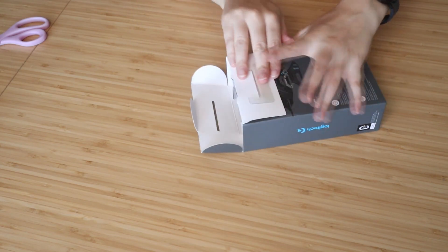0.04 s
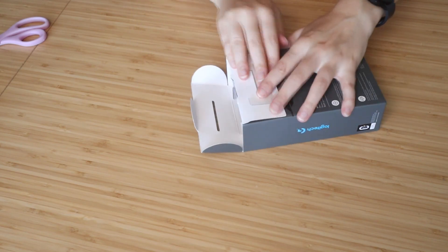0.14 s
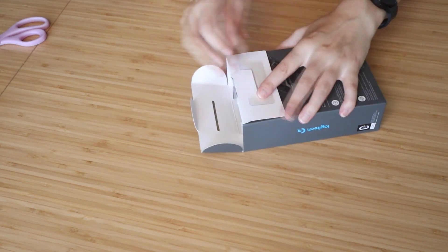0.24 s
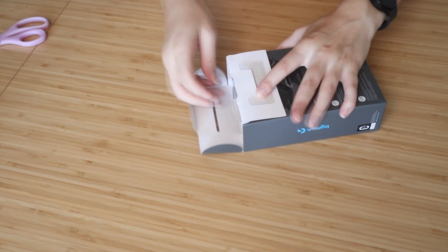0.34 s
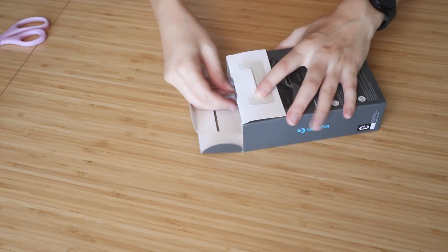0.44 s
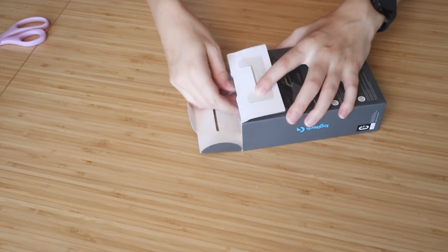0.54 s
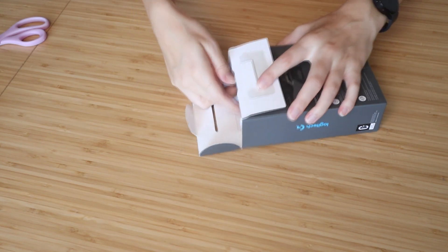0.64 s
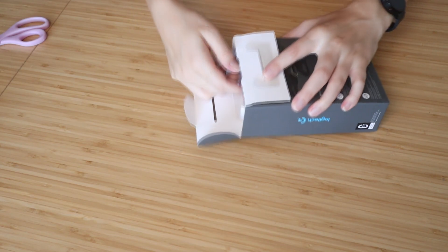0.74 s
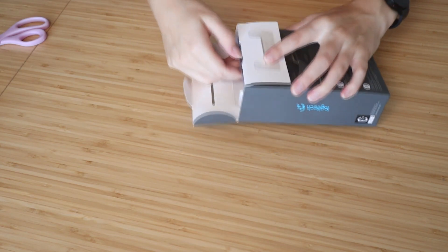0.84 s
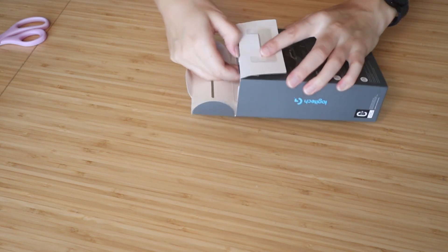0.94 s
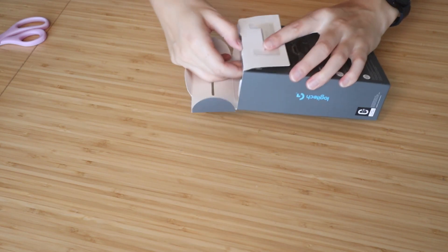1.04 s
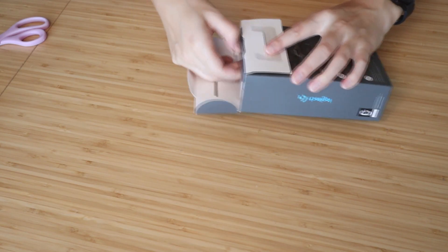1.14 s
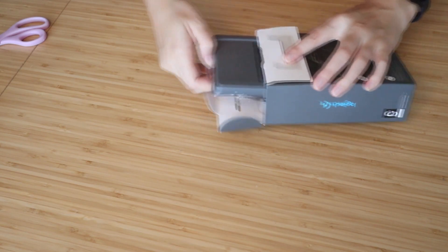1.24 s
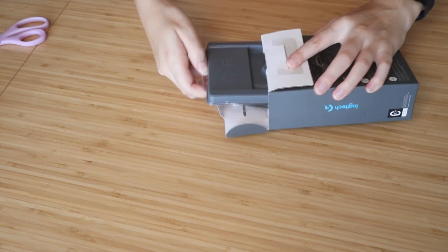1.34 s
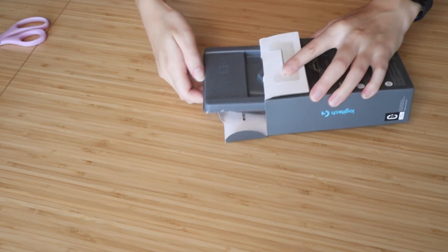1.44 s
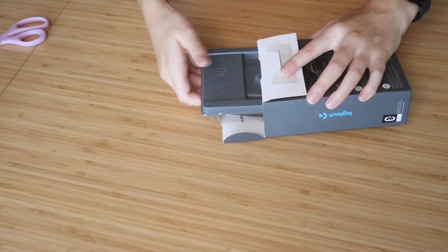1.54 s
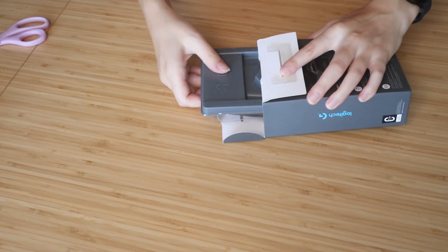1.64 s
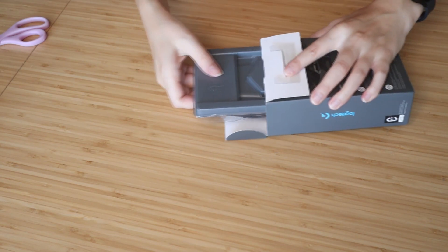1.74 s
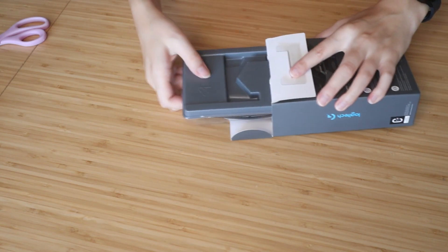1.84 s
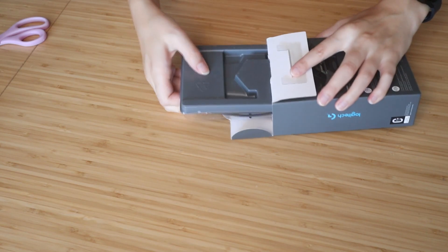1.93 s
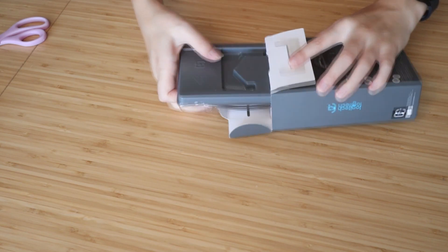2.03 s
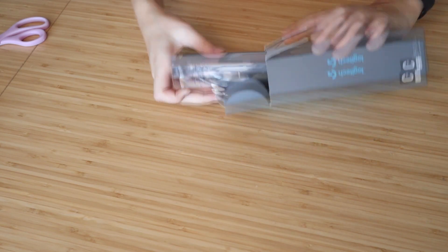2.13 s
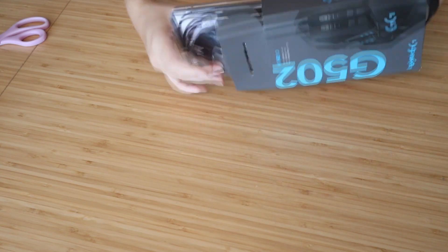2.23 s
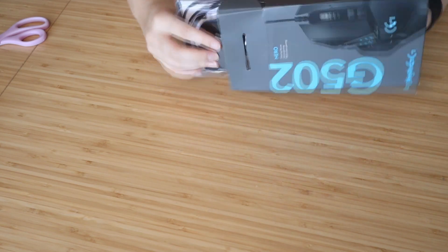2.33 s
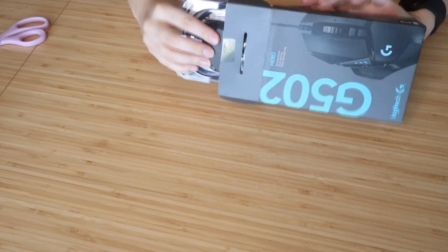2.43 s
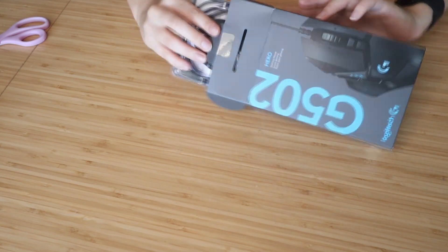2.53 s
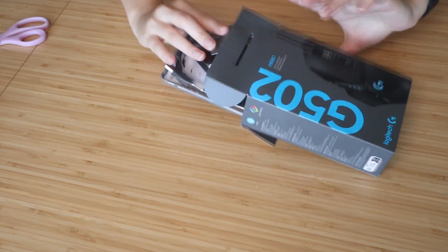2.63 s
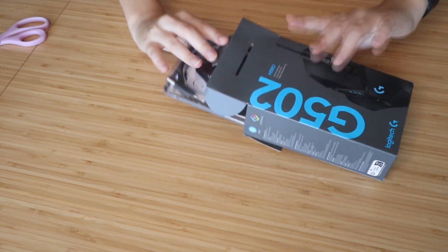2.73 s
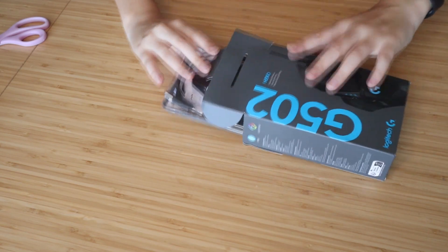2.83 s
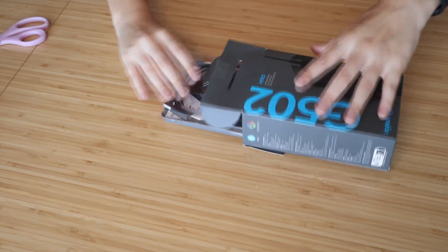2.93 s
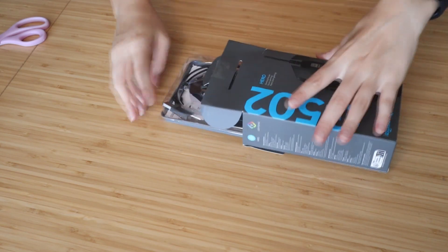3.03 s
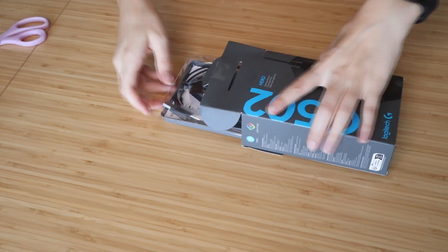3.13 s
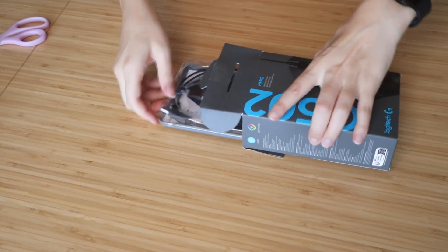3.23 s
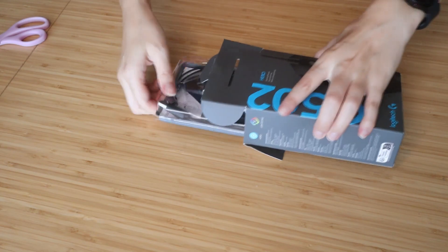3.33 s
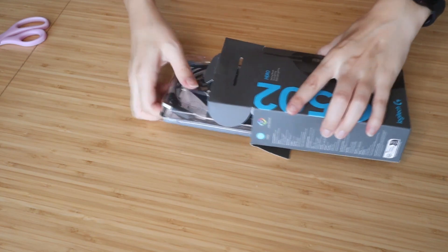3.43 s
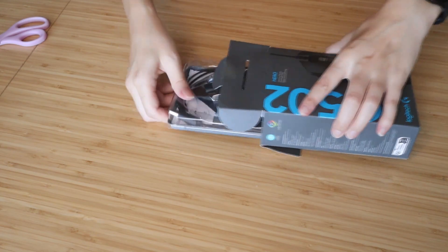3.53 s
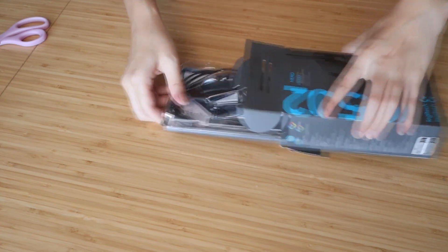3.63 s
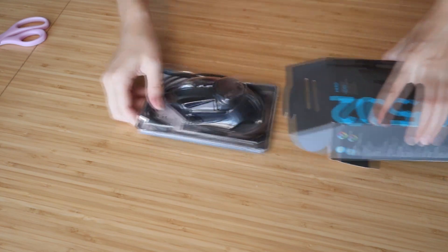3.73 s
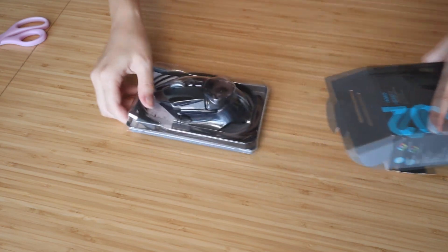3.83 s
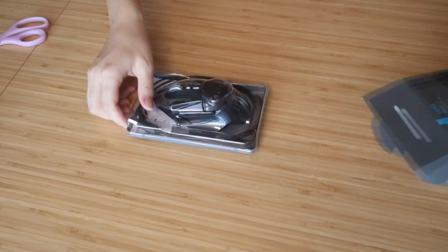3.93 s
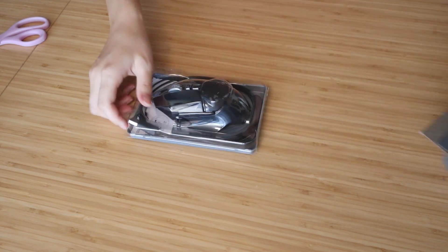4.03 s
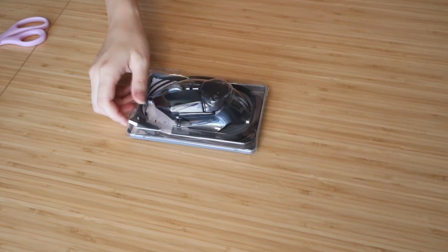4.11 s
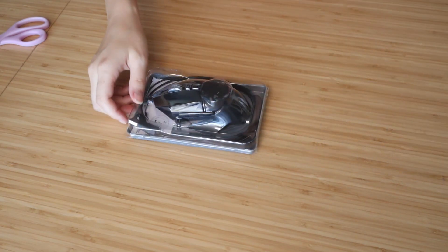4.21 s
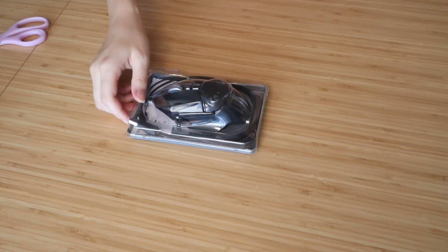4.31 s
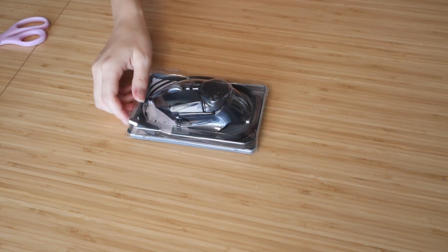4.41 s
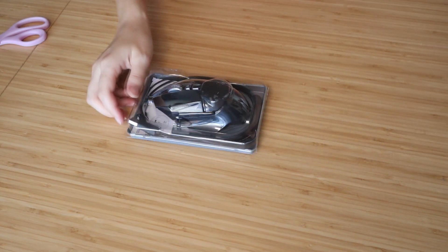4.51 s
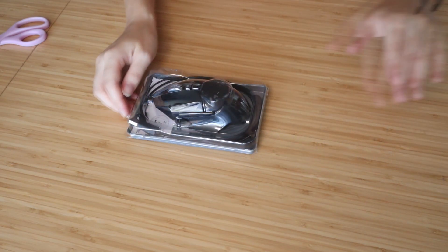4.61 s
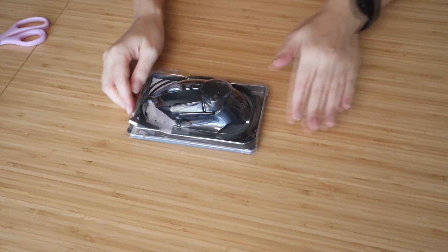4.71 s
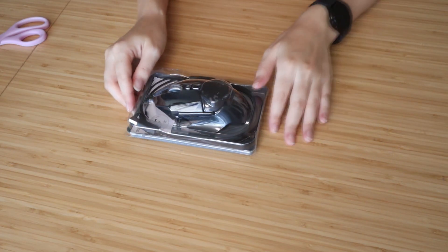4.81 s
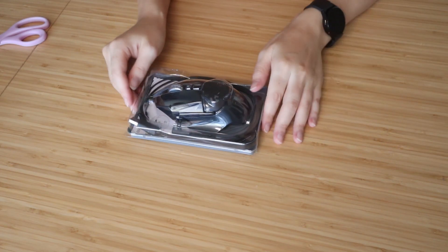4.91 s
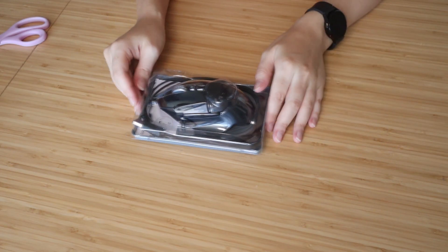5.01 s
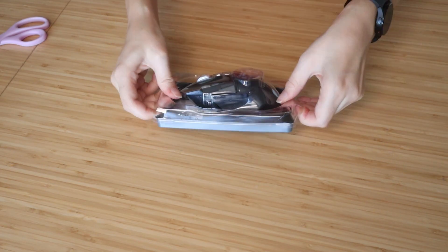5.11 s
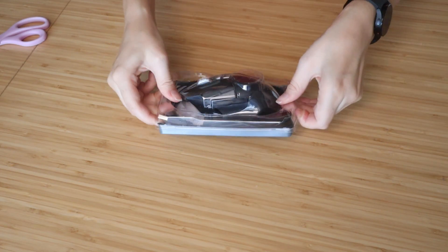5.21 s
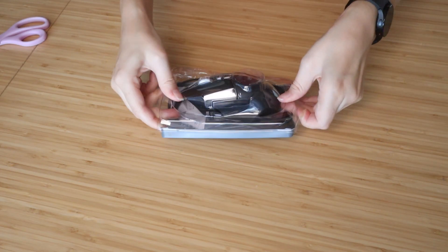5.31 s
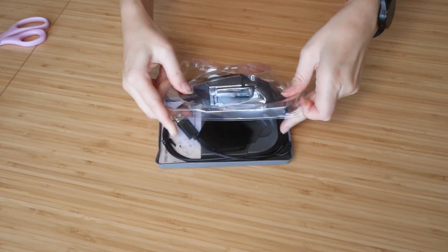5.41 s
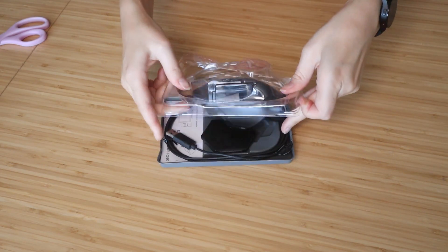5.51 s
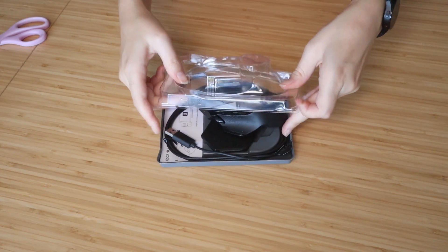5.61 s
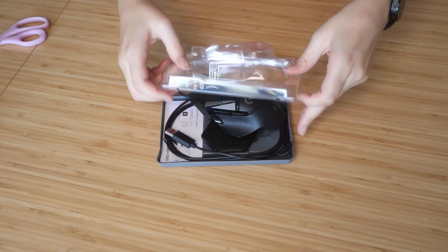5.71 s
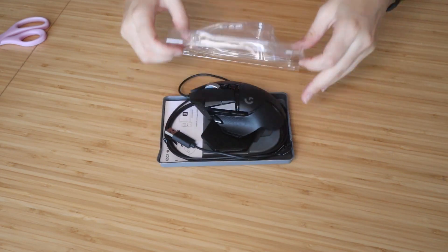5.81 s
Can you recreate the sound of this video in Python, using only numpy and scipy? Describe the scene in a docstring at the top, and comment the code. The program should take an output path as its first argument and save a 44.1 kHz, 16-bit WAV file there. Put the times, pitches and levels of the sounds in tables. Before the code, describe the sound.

Unboxing sounds captured fairly close, with short lively reflections from a bare room: quiet cardboard flicks and dry hand rubs, scattered dull knocks, a quick tray scrape, a boomy drop of the box onto the desk, more knocks, and a half-second scrape as the empty box is pushed off. Finally, bright, dense plastic snaps and a small crinkle with low bumps, ending in light taps.

```python
"""Flaps flick and hands rub as a cardboard box is opened on a wooden desk in a bare, slightly ringing room.
The inner tray rubs and groans out of its sleeve; the box is turned over, dropped and slid away.
Then the clear plastic lid of the tray creaks, snaps free and crinkles as it is lifted.
Blows are decaying modes and noise bursts; friction is random catches over hiss, coloured by the panels.
The room adds a noise echo with its own decay in each band, and faint air."""
import sys
import numpy as np
from scipy import signal
from scipy.fft import rfft, irfft, next_fast_len
from scipy.io import wavfile

SR = 44100
rng = np.random.default_rng(int(sys.argv[2]) if len(sys.argv) > 2 else 0)


def generate_wav(sig):
    """Save sig (samples, or channels by samples) to the path in sys.argv[1] as 16-bit PCM at SR."""
    pcm = np.round(np.clip(np.atleast_2d(sig).T, -1, 1) * 32767).astype(np.int16)
    wavfile.write(sys.argv[1], SR, pcm)


N = 258161
CUTOFF_HZ = 16000


def from_db(db):
    """Decibels to gain."""
    return 10 ** (np.asarray(db) / 20)


def rms_one(x):
    """Scale to rms 1."""
    return x / np.sqrt(np.mean(x ** 2) + 1e-20)


def unit_blow(x):
    """Scale a short sound to the energy of 10 ms at rms 1."""
    return x / np.sqrt(np.sum(x ** 2) / (SR / 100) + 1e-20)


def at_hz(points, hz, axis=1):
    """Read one column of a table on a log-frequency axis."""
    points = np.array(points)
    return np.interp(np.log(hz + 1e-3), np.log(points[:, 0]), points[:, axis])


def band(x, low_hz, high_hz, order=2):
    """Causal band-pass."""
    sos = signal.butter(order, [low_hz, min(high_hz, SR / 2 - 1)], "band", fs=SR, output="sos")
    return signal.sosfilt(sos, x)


def coloured(x, spectrum):
    """Give a signal the colour of a spectrum."""
    size = next_fast_len(N)
    hz = np.arange(size // 2 + 1) * SR / size
    return irfft(rfft(x, size) * from_db(at_hz(spectrum, hz)), size)[:N]


def mode(t, hz, t60_s):
    """A struck resonance: sine with exponential decay."""
    return np.sin(2 * np.pi * hz * t) * from_db(-60 * t / t60_s)


def burst(t, low_hz, high_hz, t60_s):
    """Many overlapping resonances that die together: decaying band noise."""
    decaying = rng.standard_normal(len(t)) * from_db(-60 * t / t60_s)
    return unit_blow(band(decaying, low_hz, high_hz))


# still room, relative spectrum: [f/Hz, density/dB per Hz]
AIR_COLOUR = [(25, -22), (40, -7), (58, 7.5), (85, -15), (120, 3), (170, -6), (600, -13.5), (2800, -27),
              (4200, -28), (6000, -35), (16000, -42)]
AIR_DB = -65.5


def room_air():
    """Faint steady noise of the still room."""
    return from_db(AIR_DB) * rms_one(coloured(rng.standard_normal(N), AIR_COLOUR))


ATTACK_S, RELEASE_DB_PER_S = 0.0044, 239


def strokes(table, attack_s=ATTACK_S, release_db_per_s=RELEASE_DB_PER_S):
    """Body and hiss gains of strokes: quick attack, level hold, release; overlaps add in power."""
    t = np.arange(N) / SR
    power = np.zeros((2, N))
    for start_s, length_s, body_db, hiss_db in table:
        age = np.maximum(t - start_s, 0)
        fall_db = np.minimum(release_db_per_s * np.maximum(age - length_s, 0), 200)
        envelope = np.minimum(age / attack_s, 1) * from_db(-fall_db)
        power += (from_db([[body_db], [hiss_db]]) * envelope) ** 2
    return np.sqrt(power)


# hiss above SHEEN_HZ grows faster with stroke speed: slow is dull, fast is bright
SHEEN_HZ, SHEEN_GROWTH = 5800, 0.41


def friction(gains, colour, catches_per_s, spread_db, smooth_db, body_trim_db, hiss_trim_db, sheen_db):
    """Fibres catch and let go at random over a smooth hiss; the panels give them their colour."""
    body_gain, speed = gains
    sizes = from_db(spread_db * np.minimum(rng.exponential(1, N), 4)) * rng.choice([-1, 1], N)
    impulses = sizes * (rng.random(N) < catches_per_s / SR)
    catches = coloured(rms_one(impulses), colour)
    gliding = from_db(smooth_db) * coloured(rng.standard_normal(N), colour)

    # uneven hand pressure clumps the catches
    pressure_db = 2.8 * rms_one(band(rng.standard_normal(N), 14, 70)) - 1
    body = rms_one(band(catches + gliding, 35, 2410, order=3))
    body *= body_gain * from_db(body_trim_db + pressure_db)

    # soft catches reach the treble less
    fine = rms_one(band(from_db(-5) * catches + gliding, 2200, 17000, order=3))
    brightness = from_db(sheen_db) * (speed / speed.max()) ** SHEEN_GROWTH
    sheen = band(fine, SHEEN_HZ, 20000, order=3) * brightness
    hiss = band(fine, 130, SHEEN_HZ, order=3) + sheen
    return body + hiss * speed * from_db(hiss_trim_db + .5 * pressure_db)


# hands and inner tray along the cardboard, before trims: [start t/s, length/s, body level/dB, hiss level/dB]
RUB_STROKES = [(0.0, 0.11, -53.5, -56), (0.15, 0.18, -66, -67.5), (0.455, 0.22, -59.5, -64),
               (0.665, 0.12, -61, -58), (0.8, 0.26, -63, -66), (1.03, 0.33, -57.5, -64),
               (1.26, 0.077, -42, -46.5), (1.335, 0.057, -44.5, -54.5), (1.44, .14, -56, -63.5),
               (1.785, 0.18, -56, -55.5), (2.04, 0.2, -68, -74), (2.15, 0.31, -59, -64.5),
               (2.55, 0.22, -57.5, -52.5), (2.8, 0.22, -61, -65), (2.985, 0.13, -51.5, -64.5),
               (3.18, 0.13, -57.5, -62), (3.325, .04, -54, -61.5), (3.42, 0.2, -60.5, -65),
               (3.585, 0.051, -54, -56.5), (3.655, 0.13, -51, -53), (3.73, 0.13, -51, -49)]
# rubbed cardboard, relative spectrum: [f/Hz, density/dB per Hz]
RUB_COLOUR = [(60, 2.5), (130, -20), (300, -4.5), (590, 2), (900, -3), (1450, -3.5), (2800, -8.5),
              (3900, -8), (5200, -20), (9000, -26.5), (16000, -41.5)]
# skid after each knock, before trims: levels against the knock
SKID_BODY_DB, SKID_HISS_DB, SKID_FADE_DB_PER_S = -19.5, -28.5, 142.5


def rub():
    """Hands and tray rub the cardboard, which also skids on after each knock."""
    skid_table = [(s, 0, knock_db + SKID_BODY_DB, knock_db + SKID_HISS_DB)
                  for s, _, _, knock_db, _ in BOX_KNOCKS]
    skids = strokes(skid_table, release_db_per_s=SKID_FADE_DB_PER_S)
    return friction(np.hypot(strokes(RUB_STROKES), skids), RUB_COLOUR, catches_per_s=450, spread_db=-0.5,
                    smooth_db=-4, body_trim_db=-1.5, hiss_trim_db=0.5, sheen_db=6)


CREASES_PER_S, CREASE_DB, CREASE_SPREAD_DB = 26, -3, 12.5


def creases(t60_s):
    """Small creases give way: random ticks scaled by the hiss gain of the rubbing strokes."""
    hiss_gain = strokes(RUB_STROKES)[1]
    sizes = from_db(CREASE_DB + CREASE_SPREAD_DB * rng.uniform(-2, 1, N))
    ticks = sizes * (rng.random(N) < CREASES_PER_S / SR) * hiss_gain
    return signal.fftconvolve(ticks, burst(np.arange(SR // 20) / SR, 700, 4800, t60_s))[:N]


# room echo: [f/Hz, t60/s, echo level against direct/dB]
ROOM_BANDS = [(117.8, 0.56, -5), (190, 1, -2.5), (306.7, 0.69, -2.5), (640, 0.29, -7.5), (1240, 0.36, -3.5),
              (2690, 0.48, -5), (4240, 0.45, -5), (6300, 0.38, -12.5), (16000, 1, -11.5)]


def room(x, build_s):
    """Echoes thicken within milliseconds and die away at a rate of their own in each band."""
    t = np.arange(SR) / SR
    white = rng.standard_normal((2, SR))
    build = 1 - np.exp(-(t / build_s) ** 2)
    edges = np.geomspace(45, 18000, 18)
    response = np.zeros(SR)
    for k, (low, high) in enumerate(zip(edges, edges[1:])):
        hz = np.sqrt(low * high)
        decay = from_db(-60 * t / at_hz(ROOM_BANDS, hz))
        tail = band(white[k % 2], low, high) * decay * build
        # energy in proportion to bandwidth
        share = np.sqrt(2 * (high - low) / SR / np.sum(tail ** 2))
        response += tail * share * from_db(at_hz(ROOM_BANDS, hz, axis=2))
    return signal.fftconvolve(x, response)[:N]


def knock_hush(level_db, side_s):
    """Soft noise around each knock: it swells just before and fades just after."""
    t = np.arange(N) / SR
    swell = sum(from_db(knock_db - 9 * np.abs(t - s) / side_s) for s, _, _, knock_db, _ in BOX_KNOCKS)
    return from_db(level_db) * swell * rms_one(coloured(rng.standard_normal(N), RUB_COLOUR))


def blows(table, modes, modes_db, grain_db, ring_cycles, contact_s, thump_t60_s,
          crack_hz, crack_t60_s, crack_ring_db, tick_db, lowest_hz):
    """Each blow bends one panel, rings the whole shell, thumps the air inside and cracks at the edge."""
    t = np.arange(SR // 8) / SR
    out = np.zeros(N + len(t))
    for s, panel_hz, thump_db, knock_db, crack_db in table:
        # the place of contact decides how strongly each mode answers
        shell = sum(mode(t, hz, t60_s) * from_db(db + rng.normal(0, 3)) * rng.choice([-1, 1])
                    for hz, db, t60_s in modes)
        grain = from_db(grain_db) * burst(t, 430, 2250, crack_t60_s)
        panel = unit_blow(mode(t, panel_hz, ring_cycles / panel_hz))
        struck = panel + from_db(modes_db) * unit_blow(shell) + grain
        knock = unit_blow(band(struck, lowest_hz, CUTOFF_HZ))
        thump = burst(t, 210, 430, thump_t60_s)

        edge = from_db(crack_ring_db) * unit_blow(mode(t, crack_hz, crack_t60_s))
        crack = unit_blow(edge + burst(t, .83 * crack_hz, 1.076 * crack_hz, crack_t60_s))
        top = from_db(-18) * burst(t, 9000, 15700, crack_t60_s)
        tick = unit_blow(burst(t, 4900, 9770, crack_t60_s) + top)

        gains = from_db([thump_db, knock_db, crack_db, crack_db + tick_db])
        blow = gains @ np.array([thump, knock, crack, tick])
        start = int(s * SR)
        # a soft material yields for a moment before the full force arrives
        out[start:start + len(t)] += blow * (1 - np.exp(-t / contact_s))
    return out[:N]


# box knocks, levels over 10 ms before the soft onset:
# [t/s, panel f/Hz, thump level/dB, knock level/dB, crack level/dB]
BOX_KNOCKS = [(0.013, 304, -49, -69, -90), (0.0495, 1140, -61, -52, -51.5), (0.0999, 460, -54, -50, -49.5),
              (0.2442, 590, -54, -60, -56.5), (0.3911, 1560, -96, -57.5, -61), (0.492, 437, -57, -41, -53),
              (0.5601, 450, -73, -49, -60), (0.599, 604, -65, -47, -87), (0.6568, 1200, -51, -25.5, -40),
              (0.8064, 1360, -84, -49, -49), (0.8638, 1330, -72, -50.5, -49.5),
              (1.016, 556, -80, -44.5, -67), (1.1285, 570, -55, -42.5, -54.5),
              (1.1634, 915, -48, -41.5, -57), (1.2616, 497, -51, -34.5, -48.5),
              (1.3590, 605, -51, -31, -59), (1.3858, 680, -73, -36.5, -53), (1.453, 580, -71, -43.5, -55),
              (1.5332, 570, -77, -60, -54.5), (1.7408, 630, -61, -52.5, -65),
              (1.9613, 900, -47, -42.5, -58), (2.211, 920, -49.5, -35, -50),
              (2.3889, 660, -54.5, -52, -59.5), (2.5028, 643, -31.5, -17, -53),
              (2.5072, 674, -28, -25.5, -55), (2.7501, 469, -37, -32, -61),
              (2.9729, 484, -45.5, -45.5, -77), (3.0478, 1320, -37, -35, -56.5),
              (3.2485, 580, -48.5, -53.5, -59), (3.6052, 538, -55, -45.5, -79),
              (3.7415, 620, -44.5, -36, -45), (3.7545, 654, -63, -32, -62), (3.7795, 1210, -50, -29, -46.5),
              (4.105, 490, -45, -46.5, -53), (4.5019, 634, -47.5, -47, -73)]
# cardboard shell resonances: [f/Hz, relative level/dB, t60/s]
BOX_MODES = [(412.6, -3.5, 0.031), (554.4, -15.5, 0.22), (650, 6, 0.036), (870, -8, 0.016),
             (1075, -7, 0.042), (1493, -1.5, 0.02), (1748, -9, 0.025), (2032, 3.5, 0.012)]


def box_knocks():
    """Dull blows on damped cardboard panels."""
    return blows(BOX_KNOCKS, BOX_MODES, modes_db=-3, grain_db=-7.5, ring_cycles=11, contact_s=0.00033,
                 thump_t60_s=0.049, crack_hz=3844, crack_t60_s=0.019, crack_ring_db=-9,
                 tick_db=-6.0, lowest_hz=190)


# low booms, level over 10 ms: [t/s, f/Hz, level/dB]
LOW_BOOMS = [(1.163, 122, -69), (2.503, 100.3, -32.5), (2.751, 109, -48), (3.782, 86, -51),
             (4.508, 171, -47.5), (5.455, 95, -39), (5.653, 138, -34.5)]
BOOM_T60_S = 0.093


def low_booms():
    """Soft, low booms under some of the knocks and the lid's release: decaying sines."""
    t = np.arange(N) / SR
    return sum(from_db(db) * unit_blow(mode(np.clip(t - s, 0, 1), hz, BOOM_T60_S))
               for s, hz, db in LOW_BOOMS)


GROAN_S, GROAN_LENGTH_S, GROAN_FROM_HZ, GROAN_TO_HZ, GROAN_DB = 1.28, .12, 205, 115, -47


def groan(waver):
    """Stick and slip as the tray slows in its sleeve: a low, unsteady, falling tone."""
    progress = np.clip((np.arange(N) / SR - GROAN_S) / GROAN_LENGTH_S, 0, 1)
    unsteady = 1 + waver * rms_one(band(rng.standard_normal(N), 12, 70))
    hz = GROAN_FROM_HZ * (GROAN_TO_HZ / GROAN_FROM_HZ) ** progress * unsteady
    swell = np.sqrt(4 * progress * (1 - progress))
    return from_db(GROAN_DB) * swell * np.sin(2 * np.pi * np.cumsum(hz) / SR)


def sliding(curve):
    """Body and hiss gains of one long push, fading away at both ends."""
    s, body_db, hiss_db = np.transpose(curve)
    t = np.arange(N) / SR
    fade_db = RELEASE_DB_PER_S * np.abs(t - np.clip(t, s[0], s[-1]))
    return from_db([np.interp(t, s, body_db) - fade_db, np.interp(t, s, hiss_db) - fade_db])


# empty box pushed over the desk, before trims: [t/s, body level/dB, hiss level/dB]
SLIDE_CURVE = [(3.93, -60, -62), (4.028, -49, -50), (4.118, -53, -48.5), (4.144, -55.5, -48.5),
               (4.356, -54.5, -54), (4.456, -61.5, -65.5), (4.48, -75, -68.5)]
# fingers let go of the tray and feel for the lid, before trims:
# [start t/s, length/s, body level/dB, hiss level/dB]
TOUCHES = [(4.51, 0.053, -63.5, -73.5), (4.76, .025, -72.5, -76.5), (4.9, .1, -76, -73.5),
           (5.055, 0.096, -65, -69.5), (5.16, 0.046, -51, -66)]
# sliding friction, relative spectrum: [f/Hz, density/dB per Hz]
SLIDE_COLOUR = [(60, -5), (150, -5.5), (350, -4.5), (620, 0.5), (900, -3), (1500, -1.5), (2500, -1),
                (3700, 0), (5500, -10), (8500, -19.5), (16000, -41)]


def slide_and_touches():
    """Dense catches as the empty box scrapes over the desk, then fingers touch tray and lid."""
    gains = np.hypot(sliding(SLIDE_CURVE), strokes(TOUCHES))
    return friction(gains, SLIDE_COLOUR, catches_per_s=3300, spread_db=8, smooth_db=1,
                    body_trim_db=-1.0, hiss_trim_db=2.5, sheen_db=7.0)


# HOLLOW_DB is against the slide's body gain
HOLLOW_HZ, HOLLOW_WIDTH_HZ, HOLLOW_DB = 623, 100, -8


def hollow():
    """Air in the empty box hums as it slides: narrow-band noise at the cavity pitch."""
    half_hz = HOLLOW_WIDTH_HZ / 2
    stirred = band(rng.standard_normal(N), HOLLOW_HZ - half_hz, HOLLOW_HZ + half_hz)
    return from_db(HOLLOW_DB) * sliding(SLIDE_CURVE)[0] * rms_one(stirred)


def box():
    """Dull knocks, dry rubbing, groan and slide of the cardboard box, with the low booms."""
    handling = rub() + creases(t60_s=0.036)
    strikes = knock_hush(level_db=-13.5, side_s=0.0036) + box_knocks() + low_booms()
    return handling + strikes + groan(waver=0.031) + slide_and_touches() + hollow()


# plastic lid snaps, levels over 10 ms before the soft onset:
# [t/s, panel f/Hz, thump level/dB, knock level/dB, crack level/dB]
LID_SNAPS = [(5.2364, 833, -47.5, -33.5, -31), (5.3384, 1540, -64, -25.5, -16),
             (5.3576, 1270, -76, -35, -27), (5.3712, 810, -65, -26, -29.5),
             (5.453, 530, -24.5, -19.5, -30.5), (5.4685, 1440, -43, -24.5, -34),
             (5.4721, 1270, -38, -21.5, -27.5), (5.4755, 1340, -36.5, -18, -36),
             (5.4877, 1360, -41, -23.5, -46), (5.5074, 1290, -70, -27, -58),
             (5.5262, 1260, -55, -29.5, -52), (5.5359, 1240, -54, -37, -38), (5.6649, 1550, -41, -42, -48),
             (5.6847, 940, -40.5, -38.5, -65), (5.7638, 805, -47, -45, -51.5), (5.8265, 890, -50, -45, -60)]
# lid resonances: [f/Hz, relative level/dB, t60/s]
LID_MODES = [(454, 0, 0.014), (640, -5, 0.022), (863, 5, 0.03), (1133, 4.5, 0.024), (1344, -0.5, 0.039),
             (1736, -1, 0.039), (2237, 2.5, 0.031)]


def lid_snaps():
    """Thin plastic buckles in sharp snaps."""
    return blows(LID_SNAPS, LID_MODES, modes_db=2.5, grain_db=2.5, ring_cycles=10, contact_s=.00005,
                 thump_t60_s=.022, crack_hz=4300, crack_t60_s=.005, crack_ring_db=1,
                 tick_db=-13, lowest_hz=480)


# lid on tray rim, before trims: [start t/s, length/s, body level/dB, hiss level/dB]
CRINKLE_STROKES = [(5.245, 0.092, -59.5, -50.5), (5.345, 0.026, -66, -43), (5.456, 0.012, -33, -20),
                   (5.49, 0.07, -42.5, -36.5), (5.652, 0.0074, -33.5, -33), (5.725, 0.024, -45.5, -44.5)]
# flexed plastic, relative spectrum: [f/Hz, density/dB per Hz]
CRINKLE_COLOUR = [(60, 9), (250, 2), (700, -4), (1300, 5.5), (2800, -3), (3900, -2), (6000, -12.5),
                  (9000, -16), (16000, -59)]


def lid_crinkle():
    """The lid scrapes over the rim of the tray and flexes in small crinkles."""
    flexing = strokes(CRINKLE_STROKES, attack_s=0.0088, release_db_per_s=309)
    return friction(flexing, CRINKLE_COLOUR, catches_per_s=700, spread_db=2.5, smooth_db=-12,
                    body_trim_db=2.0, hiss_trim_db=-1.0, sheen_db=3.0)


def lid():
    """Snaps of thin plastic with small crinkles between them."""
    return lid_snaps() + lid_crinkle()


def scene():
    """Direct box and lid, their echo, and the faint air of the room."""
    cardboard = box()
    direct = cardboard + lid()
    # the lid radiates differently in each direction and the walls gather all: echo a second random lid too
    other_side = cardboard + lid()
    echo = (room(direct, build_s=0.004) + room(other_side, build_s=0.004)) / np.sqrt(2)
    return (direct + echo + room_air())[None]


def record(dry):
    """Cut the deepest bass, clip at full scale, cut the top steeply."""
    high_pass = signal.butter(4, 45, "high", fs=SR, output="sos")
    low_pass = signal.ellip(10, .1, 80, CUTOFF_HZ, fs=SR, output="sos")
    thinned = signal.sosfilt(high_pass, dry)
    return signal.sosfilt(low_pass, np.clip(thinned, -1, 1))


dry = scene()
out = record(dry)
generate_wav(out)
```